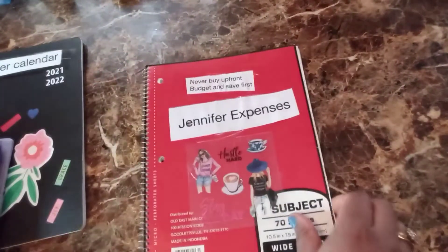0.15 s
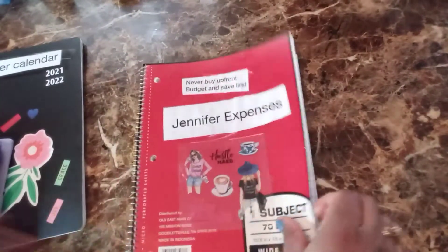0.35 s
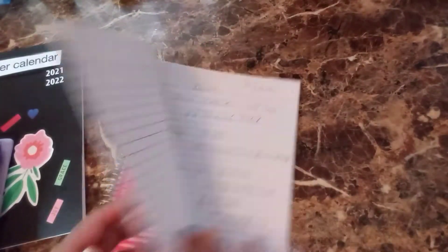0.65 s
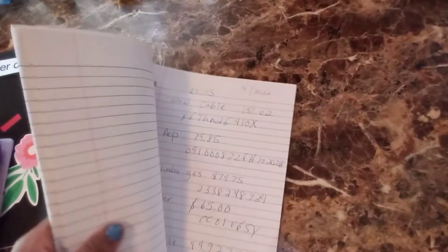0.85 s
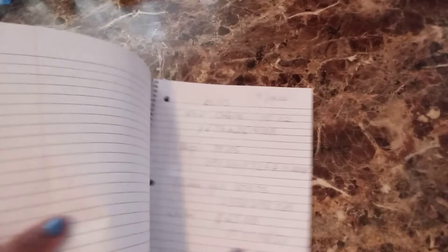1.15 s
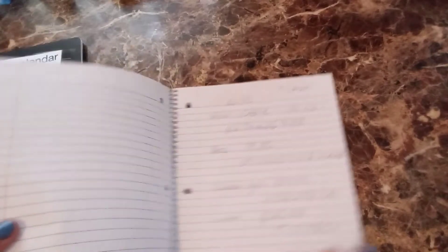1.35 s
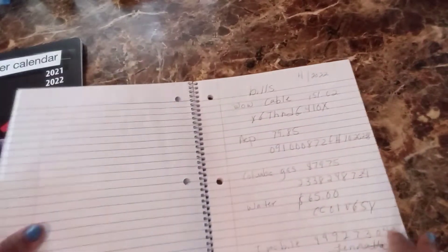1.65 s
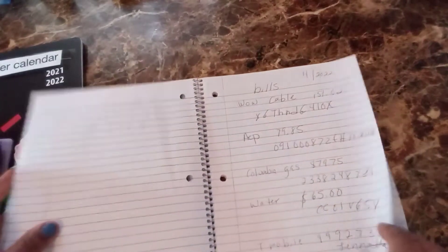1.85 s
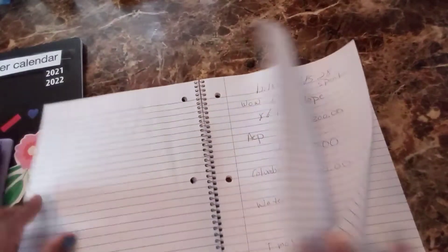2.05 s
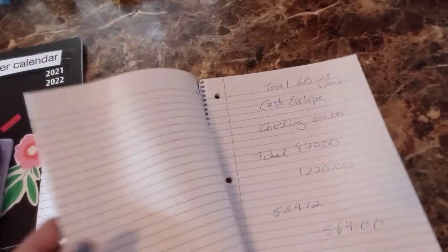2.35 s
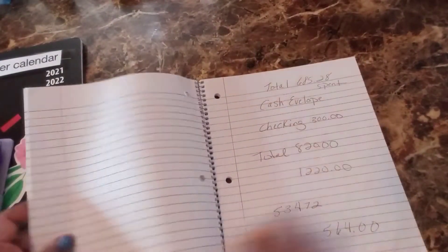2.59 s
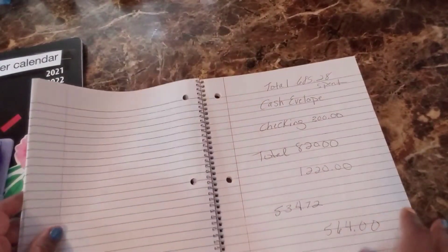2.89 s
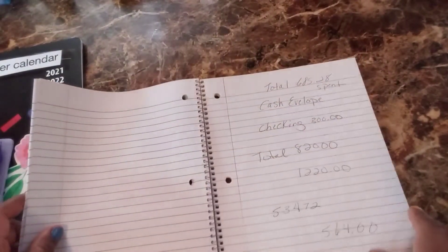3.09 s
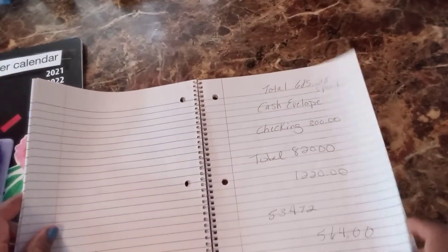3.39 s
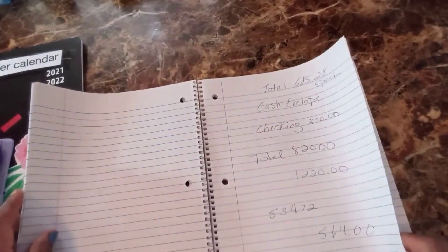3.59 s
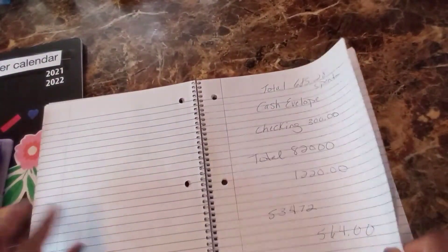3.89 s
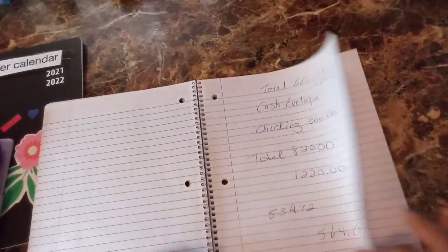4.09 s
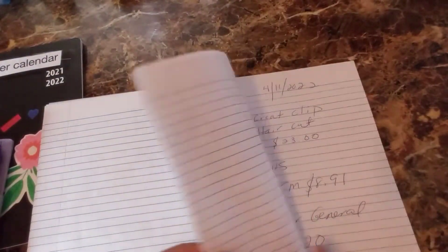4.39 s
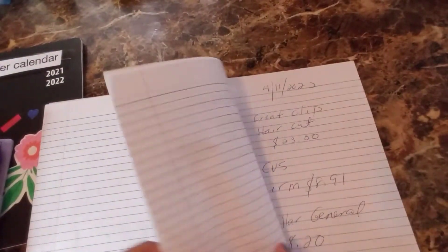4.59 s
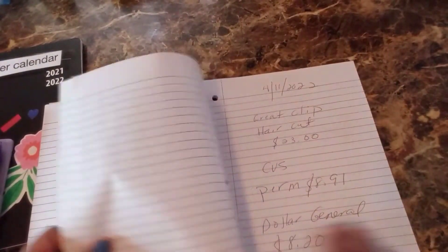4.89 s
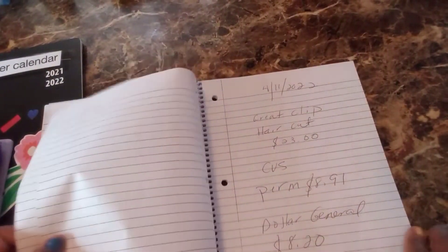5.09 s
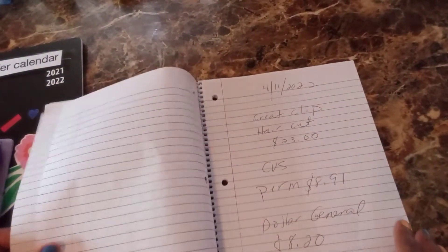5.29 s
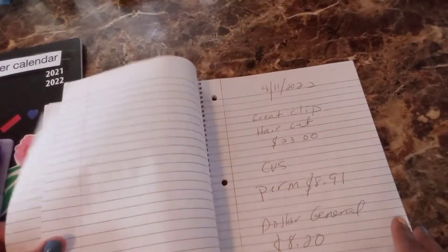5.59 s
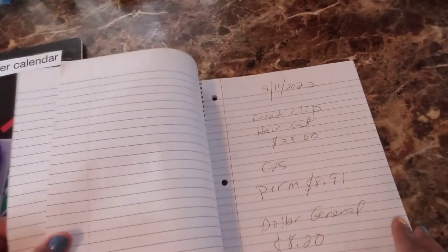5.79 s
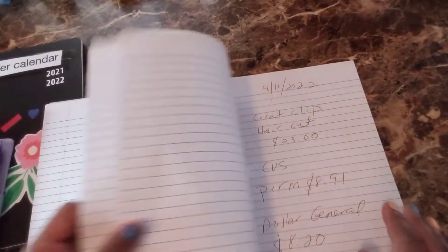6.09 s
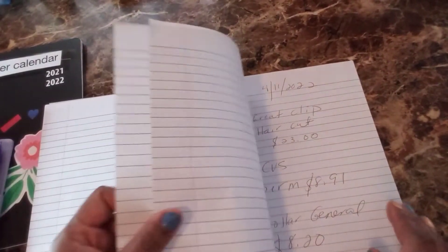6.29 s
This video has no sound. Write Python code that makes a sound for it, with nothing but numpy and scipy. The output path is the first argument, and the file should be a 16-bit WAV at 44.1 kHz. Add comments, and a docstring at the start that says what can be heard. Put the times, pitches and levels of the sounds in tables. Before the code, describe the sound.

Spiral notebook opened and leafed through up close, soft page rustles growing into crisp crackling flips, over a faint low appliance hum.

```python
"""Leafing through a spiral notebook

A spiral notebook is opened on a stone counter and leafed through, close by, in a small room.
Sheets rub, flex and scrape along the wire coil as streams of tiny clicks, and buckle with sharp snap pulses.
Slack paper flaps, edges hiss and skin, page and coil squeak: shaped noise, some of it in gliding resonances.
The notebook settles with a soft thud, and an appliance hums faintly behind it all.
"""
import sys
import numpy as np
from scipy import signal
from scipy.fft import rfft, irfft
from scipy.io import wavfile
from scipy.ndimage import uniform_filter1d

SR = 44100
rng = np.random.default_rng(int(sys.argv[2]) if len(sys.argv) > 2 else 0)


def file_out(sig):
    """Save sig as 16-bit WAV at sys.argv[1]."""
    # one column per channel
    cols = np.atleast_2d(sig).T
    # limit, then scale
    lim = np.clip(cols, -1, 1)
    pcm = np.round(lim * 32767).astype(np.int16)
    wavfile.write(sys.argv[1], SR, pcm)


N = 284445
TIME = np.arange(N) / SR

# relative colours of flexing, stray creases, rubbing and scraping: (frequency [Hz], level [dB per Hz])
FLEX_COLOUR = [(120, -74), (250, -3), (450, -7), (560, -1), (750, -0.5), (1050, -1.5), (1400, -3.5),
               (2300, -4), (5000, -65)]
CREASE_COLOUR = [(220, -30), (480, 9), (1100, 0), (2200, 33), (4000, -14), (6000, -39), (9000, -27),
                 (15000, -43)]
RUB_COLOUR = [(500, -44), (900, -2.5), (1250, 3), (1750, 3.5), (2500, 4), (4300, 6), (5100, 1.5),
              (5900, 2.5), (6500, -12), (7200, 0), (9000, -94), (14000, -46)]
SCRAPE_COLOUR = [(2000, -16.5), (4000, 9), (5100, 5), (5900, 8.5), (7100, 5), (8700, 2), (10000, -10),
                 (11500, -5.5), (13000, -1), (15500, -2)]


def sheets():
    """Coarse flexing with stray creases, finer rubbing, and the fizz of punched holes on the wire."""
    flexing, rubbing, scraping = effort()
    flex = flexing * friction(FLEX_COLOUR, per_s=700, spread_db=3, smooth=.4, patchy_db=4.5, jerk_db=1.2)
    creases = flexing * friction(CREASE_COLOUR, per_s=260, spread_db=1.5, smooth=0, patchy_db=4, jerk_db=0)
    rub = rubbing * friction(RUB_COLOUR, per_s=2200, spread_db=3, smooth=.45, patchy_db=4, jerk_db=1)
    scrape = scraping * friction(
        SCRAPE_COLOUR, per_s=3500, spread_db=3.5, smooth=.6, patchy_db=2.4, jerk_db=1.2)
    bending = gain_of(-1.5) * flex + gain_of(-17.0) * creases
    sliding = gain_of(-1.0) * rub + gain_of(5.0) * scrape
    return in_room(bending + sliding, wet_db=-7)


# one push of the hand on a sheet, as the cover is laid over and two pages are turned:
# (start [s], rise [s], length [s], swell along it [dB],
#  flexing [dB], rubbing [dB], scraping on the coil [dB]), all before the mix in sheets()
STROKES = [ (0.0, 0.0017, 0.031, -5.5, -61, -56, -66), (0.043, 0.028, 0.13, -0.5, -69, -63, -77),
           (0.36, .018, 0.046, -7, -64, -82, -94), (0.517, 0.024, 0.088, 2, -68, -70, -81),
           (0.571, 0.036, 0.14, 9.5, -64.5, -60.5, -78), (0.722, .018, 0.11, -0.5, -73, -59.5, -74),
           (0.845, 0.018, 0.087, -2, -86, -59.5, -77), (0.934, 0.062, 0.16, -2.5, -77, -65, -64.5),
           (1.085, 0.031, 0.078, -0.5, -56.5, -56, -70), (1.18, .02, 0.13, 2, -73, -65, -73),
           (1.298, 0.023, 0.11, 3.5, -68, -64, -76), (1.404, 0.03, 0.087, -1.5, -66, -57.5, -72),
           (1.497, 0.03, 0.043, -1.5, -84, -63.5, -69.5), (1.567, 0.03, .05, -1.5, -78, -66, -75),
           (1.658, 0.013, 0.14, -2.5, -73, -66, -78.5), (1.781, .018, 0.064, 1, -85, -55.5, -65.5),
           (1.878, .018, 0.12, 1, -64, -56, -73), (2.013, 0.012, 0.11, -6, -49, -48.5, -61),
           (2.118, 0.023, 0.073, 1, -72, -49, -65), (2.277, 0.027, 0.047, 6, -78, -57.5, -83),
           (2.32, 0.012, 0.022, -0.5, -76, -49, -59.5), (2.364, 0.02, 0.12, -0.5, -54, -56, -63),
           (2.492, 0.027, 0.08, -0.5, -61, -60.5, -66.5), (2.594, .02, 0.046, -1.5, -70, -55, -79),
           (2.693, 0.017, 0.2, 0.5, -87, -71.5, -78.5), (2.875, 0.021, 0.18, -4, -86, -67.5, -77.5),
           (3.255, 0.0085, 0.09, 21.5, -89, -72.5, -84.5), (3.398, 0.047, 0.097, 9, -89, -66, -84),
           (3.471, 0.02, 0.18, 0, -84, -49.5, -60), (3.63, 0.017, 0.27, -5, -68, -49, -67.5),
           (3.827, 0.025, 0.048, 4.5, -77, -48.5, -64), (3.92, .018, 0.056, 4.5, -59, -51, -63.5),
           (3.987, 0.018, 0.074, -2, -78, -54, -72), (4.056, 0.015, 0.045, 4.5, -60, -50.5, -67),
           (4.245, 0.023, 0.053, 9.5, -60.5, -59, -59), (4.281, 0.0089, 0.14, 5.5, -47, -50, -58),
           (4.475, 0.029, 0.34, 1, -53, -50, -59.5), (4.626, 0.026, 0.1, -4.5, -46, -54, -49.5),
           (4.791, 0.02, 0.13, 2.5, -51.5, -54, -72.5), (4.968, 0.036, 0.22, -3, -60, -48.5, -65),
           (5.24, 0.011, 0.094, -0.5, -53, -45.5, -68), (5.322, 0.018, 0.16, -2.5, -54.5, -48, -63),
           (5.524, 0.041, 0.11, -9, -51, -48, -64), (5.744, .02, 0.026, -3.5, -63.5, -77, -94),
           (5.824, 0.014, 0.16, 1, -88, -63.5, -84), (5.971, 0.022, 0.044, -6.5, -45, -50, -66),
           (6.016, 0.013, 0.14, 0.5, -49.5, -54.5, -68.5), (6.297, 0.013, .17, 0, -74, -69.5, -86)]
# a sheet merely held still stirs: (flexing [dB], rubbing [dB], scraping [dB]), before the same mix
HELD_DB = (-78, -77, -91)
RELEASE_DB_PER_S = 248  # a sheet coasts to rest once the push ends


def effort():
    """Gains of flexing, rubbing and scraping: each stroke rises, swells or sags while pushed, and dies away."""
    power = gain_of(HELD_DB)[:, None] ** 2 * np.ones(N)
    t = np.arange(SR) / SR
    for start, rise, length, swell_db, *levels_db in STROKES:
        attack = np.sin(np.pi / 2 * np.minimum(t / rise, 1)) ** 2
        swell = swell_db * np.minimum(t / length, 1)
        release = RELEASE_DB_PER_S * np.maximum(t - length, 0)
        shape = attack * gain_of(swell - release)
        for layer, db in zip(power, levels_db):
            add(layer, start, (gain_of(db) * shape) ** 2)
    return np.sqrt(power)


UNEVEN_DB, UNEVEN_HZ = 1.3, 22  # the hand's push wavers: depth and highest rate


def friction(colour, per_s, spread_db, smooth, patchy_db, jerk_db):
    """Fibres catch and let go in tiny clicks of uneven size, heard through the bending sheet."""
    sizes = gain_of(spread_db * np.minimum(rng.exponential(1, N), 4)) * rng.choice([-1, 1], N)
    clicks = evened(sizes * (rng.random(N) < per_s / SR))
    grains = clicks + smooth * rng.standard_normal(N)
    waver_db = jerk_db * drift(90) + UNEVEN_DB * drift(UNEVEN_HZ)
    return coloured(bend(grains, patchy_db) * gain_of(waver_db), colour)


def bend(x, patchy_db):
    """The sheet's resonances shift as it bends: narrow bands rise and fall over some 40 ms, total power kept."""
    z = signal.stft(x, SR, nperseg=512)[2]
    patches = uniform_filter1d(rng.standard_normal(z.shape), size=3, axis=0)  # neighbouring pitches
    patches = evened(uniform_filter1d(patches, size=7, axis=1))  # neighbouring moments
    bent = z * gain_of(patchy_db * patches)
    bent *= np.linalg.norm(z, axis=0) / (np.linalg.norm(bent, axis=0) + 1e-20)
    return signal.istft(bent, SR, nperseg=512)[1][:N]


# a sheet buckles or lands: (time [s], direct energy [dB], pitch [Hz], lowest radiated frequency [Hz],
#  highest radiated frequency [Hz], shiver [ms], echoes relative to the direct energy [dB])
SNAPS = [ (0.383, -38, 1400, 1110, 2780, 7.7, 8), (0.426, -30.5, 3460, 1470, 4970, 0.54, -1),
         (0.591, -35.5, 2500, 890, 16000, 1.2, 9), (.661, -35, 3200, 1200, 9000, 2.3, 0),
         (.7150, -25.5, 2600, 597, 9000, 4.2, 2.5), (0.8469, -17.5, 680, 583, 1100, 0.8, -3),
         (0.847, -14.5, 1280, 900, 3800, 0.94, -1), (1.065, -27, 2350, 2010, 3200, 1.4, 3.5),
         (1.432, -34, 1590, 1100, 9000, 1.7, 1), (1.512, -36, 3200, 1800, 16000, 2.7, 0),
         (1.606, -45, 1510, 500, 12000, 2.7, 2), (1.7773, -14, 8900, 2430, 18000, 0.54, -1),
         (1.8822, -20.5, 1050, 810, 4500, 0.6, 2.5), (2.034, -25.5, 810, 453, 2500, 6, 3),
         (2.109, -30.5, 3480, 900, 16000, 1.5, 1), (2.1514, -23, 3600, 1300, 16000, 2.8, -3),
         (2.1702, -19.5, 5560, 1500, 10000, 1.3, -6), (2.1718, -13, 1530, 1190, 4000, 3.6, 2.5),
         (2.352, -13.5, 1270, 413, 9000, 1.4, -0.5), (2.6242, -27, 3850, 584, 16000, 4, 4.5),
         (2.9183, -32.5, 5400, 2130, 15000, 2.4, 6.5), (3.696, -25.5, 1630, 890, 5000, 0.86, 5),
         (3.932, -18, 2880, 1650, 14100, 5.2, 5), (3.9522, -15.5, 3870, 2000, 12000, 1.6, -10),
         (4.029, -33, 4200, 2010, 16000, 3.6, 1), (4.093, -17.5, 3040, 1410, 16000, 1.2, 1.5),
         (4.0961, -10.5, 2360, 890, 14000, 2.3, 2), (4.1050, -17, 3930, 1200, 9000, 1.9, -11),
         (4.1085, -12, 1970, 655, 5000, 3.1, 2), (4.1182, -20, 2090, 895, 4000, 1.3, -4),
         (4.282, -21, 1380, 596, 11800, 1.1, 2), (4.294, -16.5, 6600, 900, 10000, 2.6, 1),
         (4.304, -16, 635, 230, 3000, 2.6, 0), (4.333, -17.5, 1100, 696, 8000, 1.8, 1),
         (4.349, -12.5, 990, 400, 7000, 2, -2), (4.360, -20, 900, 495, 3500, 2.7, -9),
         (4.374, -13, 3750, 600, 8000, 1.7, -2), (4.397, -18, 1240, 700, 3500, 1.8, -14),
         (4.4248, -8.5, 1640, 790, 7000, 3.5, 0), (4.4358, -9.5, 1700, 890, 5000, 2, -12),
         (4.4694, -12.5, 2600, 576, 7000, 1.5, 2), (4.490, -20, 646, 450, 2000, 2.3, -7),
         (4.5097, -17, 4040, 2000, 7000, 0.81, -9), (4.5223, -3.5, 3150, 2130, 14100, 0.44, -1.5),
         (4.522, -17, 1080, 595, 2000, 1, 3.5), (4.529, -13.5, 1010, 500, 4500, 2.8, -5),
         (4.6338, -12.5, 3340, 1400, 10000, 1, 0), (4.6541, -10, 1230, 686, 5030, 1.4, -3),
         (4.663, -11.5, 3400, 600, 14000, 1.1, 2), (4.690, -28, 1250, 600, 7900, 1.2, -8),
         (4.7080, -9.5, 3870, 673, 10000, 2.2, 2), (4.7111, -9.5, 1640, 800, 5000, 2.3, -7),
         (4.7178, -16, 2200, 600, 7000, 1.5, 2), (4.7212, -11, 3580, 500, 9000, 1.2, -1),
         (4.7456, -11.5, 2880, 486, 8000, 1.4, -1.5), (4.7518, -19.5, 1400, 500, 6000, 1, 2),
         (4.765, -17, 3400, 1500, 12000, 1.5, -13), (4.819, -16.5, 930, 597, 4000, 0.37, -8),
         (4.8432, -15.5, 1120, 422, 6000, 2.2, 5), (4.8556, -16, 810, 298, 6040, 2.8, 0),
         (4.861, -18, 2500, 800, 7000, 3.5, -3), (4.87, -22, 2400, 600, 7000, 1, -12),
         (4.8925, -20.5, 880, 500, 3020, 1.6, 3), (4.9015, -28, 1390, 700, 4000, 1.2, -4),
         (4.922, -30, 1190, 600, 3500, 1.5, -3), (4.934, -23, 740, 503, 2000, 2.4, -1),
         (5.0297, -25, 2520, 700, 7000, 1, 1), (5.033, -10, 3280, 720, 9500, 3, -5),
         (5.079, -21.5, 2340, 460, 8000, 2.1, 2.5), (5.2485, -9.5, 3900, 1010, 11600, 1.8, -0.5),
         (5.249, -20.5, 1160, 910, 2000, 1.6, 8), (5.2821, -17.5, 3160, 593, 10000, 3, 2),
         (5.310, -20, 1000, 450, 3500, 3.9, -4), (5.3248, -21, 2910, 900, 12000, 2, 4),
         (5.384, -27.5, 6500, 4000, 12000, 4, -5), (5.467, -25, 1600, 805, 5000, 5.5, 2),
         (5.4798, -19, 2610, 1020, 3980, 2.8, -5), (5.662, -35.5, 1520, 700, 4000, 6.7, -10),
         (5.839, -38, 5530, 2800, 6450, 8.3, 1), (5.9663, -12.5, 1950, 1280, 6740, 6, -1.5),
         (6.035, -23, 1820, 500, 9000, 2.2, 4), (6.0575, -20.5, 3150, 398, 16000, 0.35, 1),
         (6.084, -20.5, 2900, 500, 12000, 3.7, 3.5), (6.099, -22.5, 448, 280, 3500, 6.3, 6.5),
         (6.1513, -19, 620, 302, 3500, 2.2, -6), (6.1571, -19.5, 1920, 397, 9000, 2, -4)]
# a snap's spectrum about its own pitch: (ratio to the pitch, relative level [dB per Hz])
SNAP_SHAPE = [(.06, 0.5), (.25, 1), (.55, -3), (1, 3), (1.5, -2.5), (2.5, -9.5), (5, -16.5), (12, -86)]
# a fixed colour shared by every snap: (frequency [Hz], relative level [dB])
SNAP_COLOUR = [(60, -32), (250, 8), (600, 1), (5800, 2), (7500, -1.5), (10000, -9), (13000, 4), (16000, 3)]


def snaps(size=1024):
    """Each snap has a faint noisy rise of about 2 ms, a sharp push, a few ms of shiver, then room echoes."""
    out = np.zeros(N)
    t = np.arange(-size // 2, size) / SR  # the push comes at t = 0
    for s, db, hz, lowest_hz, highest_hz, shiver_ms, echo_db in SNAPS:
        pop = disperse(pulse(lambda f: read(SNAP_SHAPE, f / hz) + read(SNAP_COLOUR, f)))
        pop = signal.sosfilt(signal.butter(3, lowest_hz, "high", fs=SR, output="sos"), pop)
        pop = signal.lfilter(*signal.butter(2, min(highest_hz, 20000), fs=SR), pop)
        pop *= gain_of(db) / np.linalg.norm(pop)
        rise = gain_of(-25) * np.exp(-abs(t) / .0022)
        shiver = 0.28 * np.exp(-abs(t) / (shiver_ms / 10 ** 3))
        tremble = np.where(t < 0, rise, shiver) * rng.standard_normal(len(t))
        push = np.where(t == 0, 1, tremble)
        snap = np.convolve(push, pop)
        add(out, s + t[0], gain_of(db) * snap / np.linalg.norm(snap))
        # the room gathers every direction, so its echoes carry the pop's smooth colour, less some treble
        dulled = signal.lfilter(*signal.butter(1, 9000, fs=SR), pop)
        add(out, s, gain_of(echo_db) * signal.fftconvolve(dulled, room()))
    return out


SPREAD_S = 0.000389  # bending waves are slower when low: how late 1 kHz leaves a snap


def disperse(x, size=4096):
    """A bend travels through the sheet, treble first."""
    hz = np.fft.rfftfreq(size, 1 / SR)
    phase = -2 * np.pi * 2 * SPREAD_S * np.sqrt(10 ** 3 * hz)
    return irfft(rfft(x, size) * np.exp(1j * phase), size)[:len(x)]


# a sheet sinks on its cushion of air and flaps softly:
# (start [s], rise [s], fall [s], level before the swell shapes it [dB], pitch [Hz])
FLAPS = [(0.711, 0.011, 0.02, -57.5, 593), (0.996, 0.021, 0.035, -60, 594), (1.128, 0.013, 0.054, -50, 740),
         (1.2, 0.026, 0.14, -69, 690), (2.358, 0.011, 0.046, -47.5, 615), (2.405, 0.018, 0.057, -52.5, 680),
         (4.33, 0.019, 0.025, -54, 850), (4.475, 0.014, 0.045, -41.5, 635), (4.705, 0.022, .045, -46, 553),
         (4.843, 0.02, 0.032, -48, 560), (4.88, 0.029, 0.076, -55, 710), (5.074, 0.022, 0.023, -66, 680),
         (5.275, 0.023, 0.034, -48.5, 810), (6.09, 0.055, 0.042, -50, 590)]
# a flap's spectrum about its own pitch: (ratio to the pitch, relative level [dB per Hz])
FLAP_SHAPE = [(.2, -23), (.55, 0.5), (1, 6), (1.5, -7), (2.6, -31), (6, -43)]


def flaps():
    """Many slack bends in quick succession, too soft to click, swell and sink together."""
    out = np.zeros(N)
    for start, rise, fall, db, hz in FLAPS:
        t = np.arange(0, rise + fall, 1 / SR)
        bends = rng.standard_normal(len(t)) * (rng.random(len(t)) < 900 / SR)  # about 900 a second
        ring = disperse(pulse(lambda f: read(FLAP_SHAPE, f / hz)))
        body = signal.fftconvolve(bends, ring)[:len(t)]
        swell = np.interp(t, [0, rise, rise + fall], [0, 1, 0])
        add(out, start, gain_of(db) * evened(body) * swell)
    return out


# a cut edge glides over the sheet below with an airy hiss: (start [s], length [s], level at its peak [dB])
GLIDES = [(0.57, .07, -70), (0.71, .13, -71), (0.96, 0.18, -61), (1.25, 0.046, -84), (1.49, .07, -74),
          (2.01, 0.22, -65), (2.308, 0.29, -64), (3.54, 0.081, -67), (3.71, 0.056, -66), (3.85, .07, -59),
          (4.25, 0.21, -56), (4.625, 0.17, -49), (5.25, .06, -58), (5.36, 0.055, -67), (6.02, .09, -63)]
# the colour of that hiss: (frequency [Hz], relative level [dB per Hz])
AIR_COLOUR = [(5000, -38), (8500, -8), (10000, -13), (12500, -1), (16000, -0.5)]


def glides():
    """The finest friction of all, swelling and sinking with the speed of the edge."""
    speed = np.zeros(N)
    for start, length, db in GLIDES:
        arch = np.sin(np.pi * np.arange(0, length, 1 / SR) / length).clip(0)
        add(speed, start, gain_of(db) * np.sqrt(arch))
    hiss = rng.standard_normal(N) * gain_of(UNEVEN_DB * drift(UNEVEN_HZ))
    return in_room(speed * coloured(hiss, AIR_COLOUR), wet_db=-10)


# a fingertip on the cover, a page edge and the coil stick and slip:
# (time [s], level before the part's own [dB], pitch [Hz])
COVER_SQUEAK = [(.066, -90, 1930), (.072, -53, 1976), (.09, -71, 1973), (.101, -52.5, 2090),
                (.125, -63.5, 2134), (.15, -75, 2240)]
EDGE_SQUEAK = [(3.49, -42.5, 2950), (3.55, -36, 2795), (3.59, -30, 2703), (3.63, -36, 2543),
               (3.68, -42.5, 2390), (3.75, -38.5, 2300), (3.82, -50, 2320)]
COIL_SQUEAK = [(1.12, -66, 4260), (1.22, -67, 4330), (1.27, -57, 4270), (1.33, -66, 4150),
               (1.42, -65, 4200), (1.5, -67, 4180), (1.57, -72, 4200)]
# what rings in each squeak: (multiple of the pitch, level [dB])
COVER_PARTS = [(1, 4.5), (1.85, 0), (2.3, -6), (4.15, -14), (4.55, -27)]
EDGE_PARTS = [(1, -12), (1.5, -20.5)]
COIL_PARTS = [(0.99, 0)]


def squeaks():
    """Surfaces stick and slip many times a second, heard as fuzzy high notes."""
    cover = note(COVER_SQUEAK, COVER_PARTS, width_hz=330)
    edge = note(EDGE_SQUEAK, EDGE_PARTS, width_hz=890)
    return cover + edge + note(COIL_SQUEAK, COIL_PARTS, width_hz=700)


# the opened cover and its pages settle: (time [s], level before the part's own [dB], pitch [Hz])
SETTLE = [(1.12, -87, 79.4), (1.16, -65, 73.7), (1.21, -70, 72), (1.28, -92, 69)]
# what rings in the thud: (multiple of the pitch, level [dB])
SETTLE_PARTS = [(1, -2), (2, 0), (4, -7)]


def thud():
    """The opened cover and its pages settle on the counter with a soft low note."""
    return note(SETTLE, SETTLE_PARTS, width_hz=8.2)


def note(curve, parts, width_hz):
    """A fuzzy gliding note with its overtones: stick and slip when high, a soft thud when low."""
    s, db, hz = np.transpose(curve)
    pitch = np.interp(TIME, s, hz)
    tone = sum(gain_of(part_db) * whistle(pitch * multiple, width_hz) for multiple, part_db in parts)
    sounding = (TIME > s[0]) * (TIME < s[-1])
    return tone * gain_of(np.interp(TIME, s, db)) * sounding


def whistle(hz, width_hz):
    """Noise in one steep resonance that follows the pitch hz, at rms 1."""
    lowpass = signal.butter(2, width_hz / 2, fs=SR, output="sos")
    sway = signal.sosfilt(lowpass, [1, 1j] @ rng.standard_normal((2, N)))
    turning = np.exp(2j * np.pi * np.cumsum(hz * np.ones(N)) / SR)
    return evened((sway * turning).real)


# a few narrow pitches lifted in the paper sound: (frequency [Hz], lift [dB])
LIFTED_PITCHES = [(467, 6.5), (707, 5.5), (765, 5.5), (902, 3.5), (1019, 5.5), (1168, 4), (1269, 3),
                  (1636, 3)]
LIFT_WIDTH_HZ = 15


def lift_pitches(x):
    """Narrow resonant filters add a little more of a few pitches to the sound."""
    lifted = x.copy()
    for hz, db in LIFTED_PITCHES:
        resonance = signal.iirpeak(hz, hz / LIFT_WIDTH_HZ, fs=SR)
        lifted += (gain_of(db) - 1) * signal.lfilter(*resonance, x)
    return lifted


# how long the room rings: (frequency [Hz], time to fall by 60 dB [s])
ROOM_DECAY = [(200, 0.23), (1000, 0.25), (2800, 0.32), (7000, 0.3), (15000, 0.43)]


def room(early_db=7, early_s=0.084, gap_s=0.0027, size=16384):
    """Echoes from one spot, energy 1: strong ones off counter and cupboards, then a tail dying by band."""
    t = np.arange(size) / SR
    taps = rng.standard_normal(size) * (rng.random(size) < 4000 / SR)  # about 4000 a second
    taps *= np.clip(t / gap_s - .5, 0, 1) * (1 + gain_of(early_db) * np.exp(-t / early_s))
    hz, at, z = signal.stft(taps, SR, nperseg=256)
    decay = gain_of(-60 * at / read(ROOM_DECAY, hz)[:, None])
    tail = signal.istft(z * decay, SR, nperseg=256)[1][:size]
    return tail / np.linalg.norm(tail)


SPOT_S = 0.2  # the sounding patch of paper has moved to a new spot after this time


def in_room(x, wet_db):
    """The echoes change as the page swings from spot to spot, each set fading into the next."""
    echoes = np.zeros(N)
    for s in np.arange(0, N / SR + SPOT_S, SPOT_S):
        near = abs(TIME - s) < SPOT_S
        fade = np.cos(np.pi / 2 * (TIME[near] - s) / SPOT_S)
        add(echoes, TIME[near][0], signal.fftconvolve(x[near] * fade, room()))
    return (x + gain_of(wet_db) * echoes) / np.sqrt(1 + gain_of(wet_db) ** 2)


# the appliance's resonances: (frequency [Hz], width [Hz], rms level before the flutter [dB])
HUM = [(112.7, 24.4, -69.5), (146.5, 16.3, -67.5), (161.2, 12.7, -62), (202.8, 18.4, -56),
       (245, 16.3, -65.5), (278.6, 29.5, -64), (346, 53.6, -67.5)]
# the relative colour of its wash of air: (frequency [Hz], level [dB per Hz])
WASH_COLOUR = [(25, -35), (60, -16), (85, -6), (110, 11.5), (200, 14.5), (330, -13.5), (450, -7.5),
               (660, -2.5), (1000, -16.5), (2500, -39), (4500, -18), (7000, -23.5), (9500, -49),
               (15000, -23.5)]
HUM_STEADY_S = 0.31  # the fan's mean level holds over this time


def appliance():
    """A fan's rumble flutters about a steady level in low resonances, over a faint wash of air."""
    hum = sum(gain_of(db) * whistle(hz, width) for hz, width, db in HUM)
    hum = hum * gain_of(2.23 * drift(10))
    slow_level = np.sqrt(uniform_filter1d(hum ** 2, round(HUM_STEADY_S * SR)))
    hum = hum / evened(slow_level)
    return hum + gain_of(-61.5) * coloured(rng.standard_normal(N), WASH_COLOUR)


def gain_of(db):
    """Decibels as an amplitude factor."""
    return 10 ** (np.asarray(db) / 20)


def evened(x):
    """x scaled to rms 1."""
    return x / np.sqrt(np.mean(x ** 2) + 1e-20)


def read(points, hz):
    """A table's value, joined by straight lines over log frequency."""
    f, value = np.transpose(points)
    return np.interp(np.log(hz + 1e-9), np.log(f), value)


def add(mix, s, sound):
    """Add a sound into the mix from s seconds on."""
    part = mix[max(round(s * SR), 0):][:len(sound)]
    part += sound[:len(part)]


def pulse(db_at, size=2048):
    """The shortest causal pulse with the spectrum db_at(Hz)."""
    log_gain = np.log(gain_of(db_at(abs(np.fft.fftfreq(size, 1 / SR)))))
    return np.fft.ifft(np.exp(np.conj(signal.hilbert(log_gain)))).real[:size // 2]


def coloured(x, points):
    """x filtered by the given spectrum, at rms 1."""
    return evened(irfft(rfft(x) * gain_of(read(points, np.fft.rfftfreq(N, 1 / SR))), N))


def drift(rate_hz):
    """Slow random wandering of rms 1, with nothing faster than rate_hz."""
    slow = np.fft.rfftfreq(N, 1 / SR) < rate_hz
    return evened(irfft(rfft(rng.standard_normal(N)) * slow, N))


def scene():
    """Paper, squeaks and flaps get the lifted pitches; the edge hiss, thud and hum are added beside them."""
    buckling = bend(snaps(), patchy_db=2.8)
    notebook = sheets() + buckling + in_room(squeaks() + flaps(), wet_db=-2.0)
    return (lift_pitches(notebook) + glides() + thud() + appliance())[None]


EDGE_HZ = 16000


def record(dry):
    """The band limit: a steep filter removes what lies above the edge."""
    lowpass = signal.firwin(511, EDGE_HZ, window=("kaiser", 9), fs=SR)
    return signal.oaconvolve(dry, lowpass[None], "same")


dry = scene()
out = record(dry)
file_out(out)
```